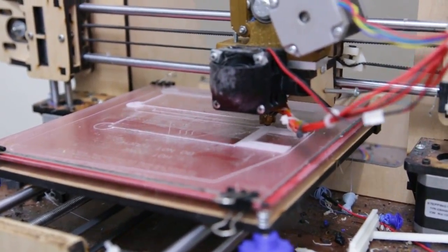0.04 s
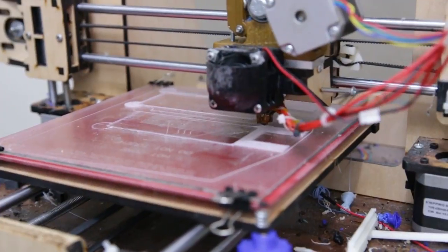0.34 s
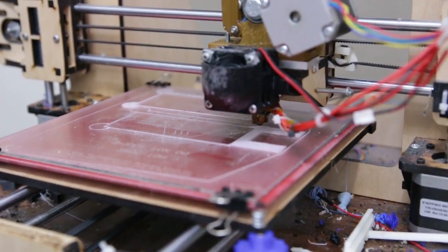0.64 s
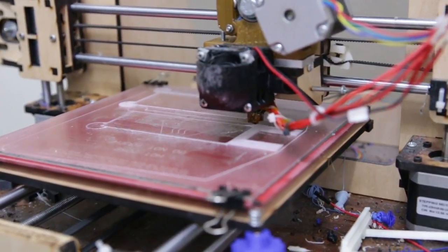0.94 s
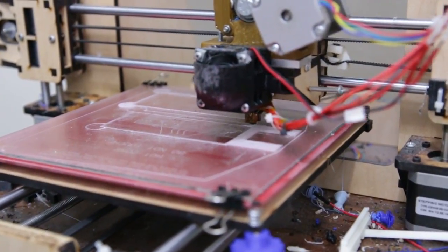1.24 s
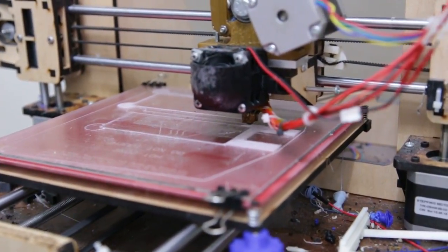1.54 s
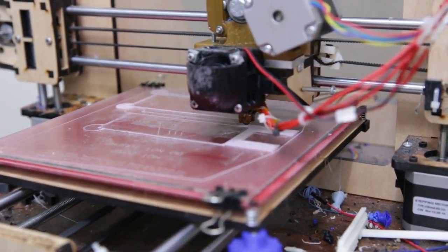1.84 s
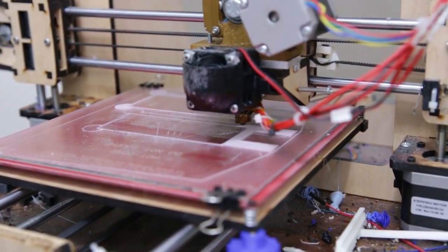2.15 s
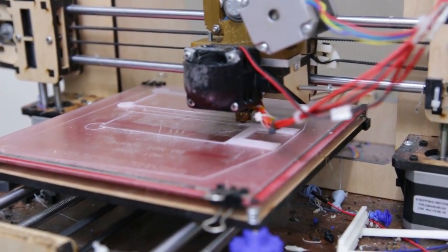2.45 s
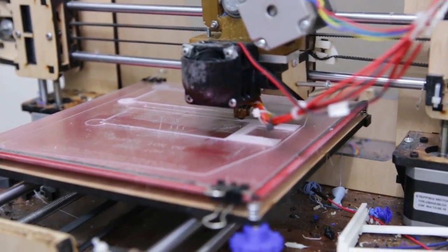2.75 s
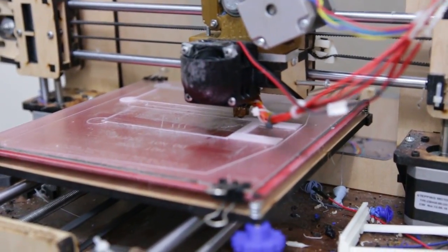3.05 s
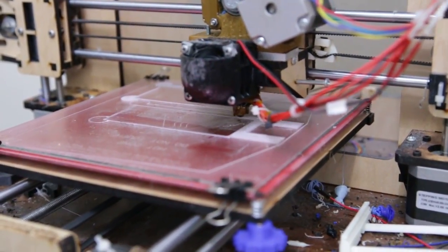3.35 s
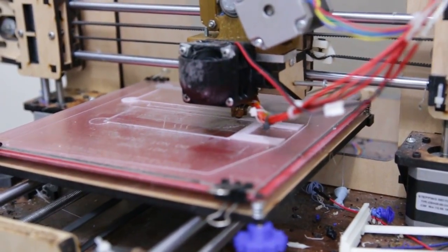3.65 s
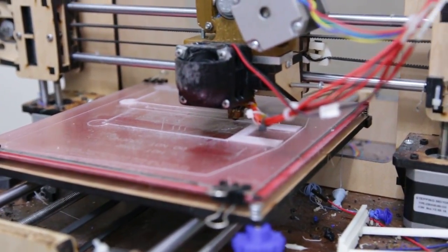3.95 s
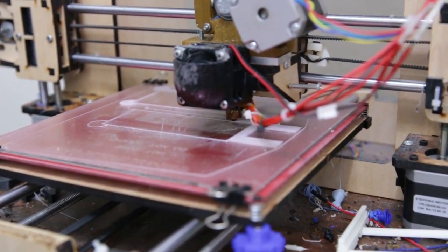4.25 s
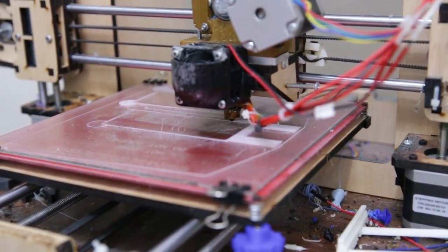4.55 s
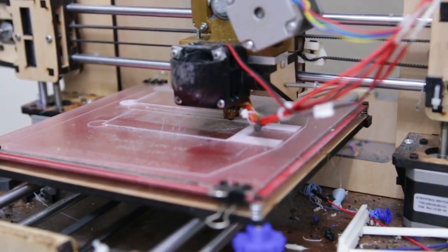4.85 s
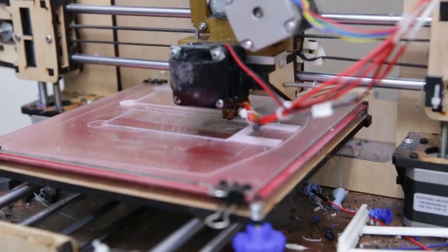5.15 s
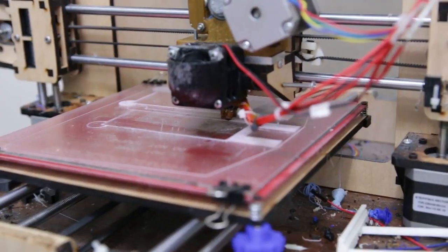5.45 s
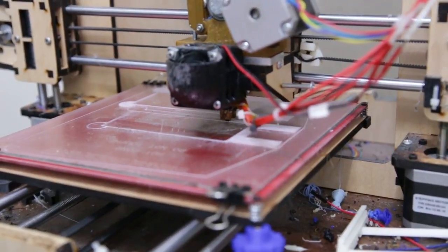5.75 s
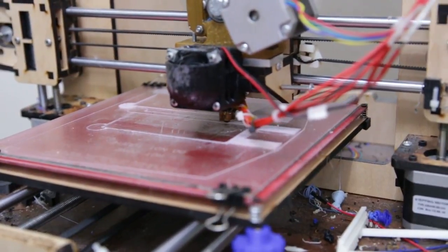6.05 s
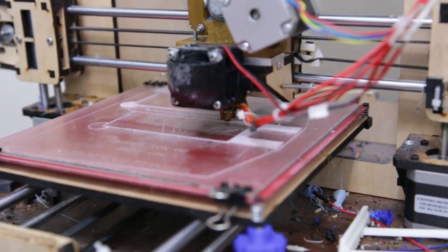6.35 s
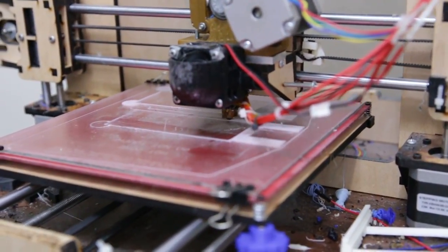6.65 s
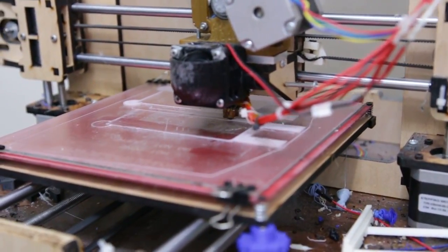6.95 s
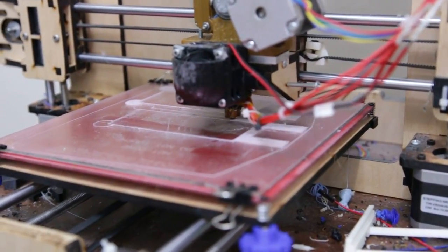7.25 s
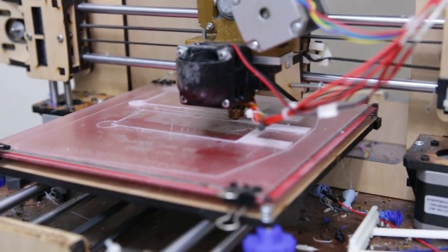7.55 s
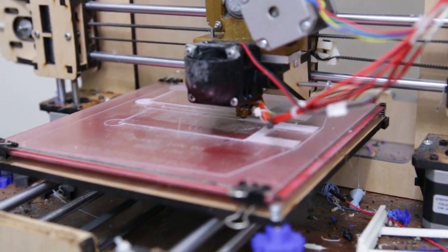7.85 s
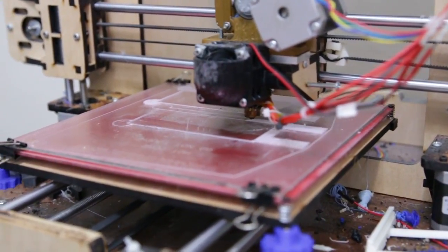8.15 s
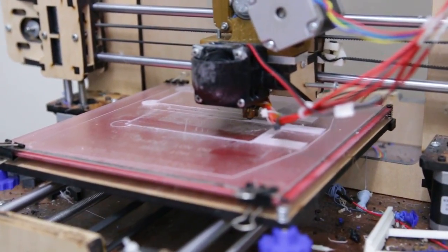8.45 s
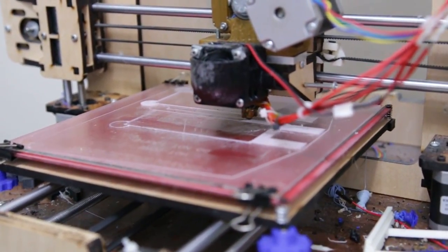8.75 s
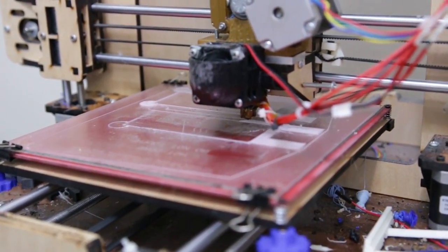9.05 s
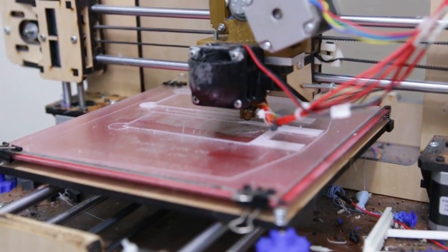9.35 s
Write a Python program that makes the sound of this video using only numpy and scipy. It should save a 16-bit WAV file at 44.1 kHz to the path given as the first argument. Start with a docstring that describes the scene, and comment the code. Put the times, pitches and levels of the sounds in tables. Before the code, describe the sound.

A small 3D printer runs indoors from start to finish, a little over nine seconds. Its head shuttles back and forth at about six strokes a second. On each stroke the motor speeds up and brakes, making a low, mellow, warbling hum that resonates in the wooden frame and repeats as a fast, even flutter. This hum is the loudest sound. Beneath it, bearings rattle lightly in the same rhythm, growing slightly stronger after about 4 seconds, and a thin, very high electrical sizzle comes in short bursts. A fan whooshes softly and steadily underneath. Brief, small clacks occur near 0.2 seconds, at 3.1 and 3.4, around 4.5, at 6, and several times between 7.3 and 8. One tiny, sharp, bright tick snaps at about 4.4 seconds. The room adds only a faint echo, and the pace never changes.

```python
"""A small 3D printer's stepper motor drives the head to and fro, about six strokes a second, filling in a
narrow wall. On each stroke the motor speeds up and brakes. Its slightly uneven pull (torque ripple) sweeps
through the ringing notes of the plywood frame and shakes the bearings into a rattle. The coils sizzle in
short bursts, a fan whooshes softly underneath, and once something ticks sharply."""
import sys
import numpy as np
from scipy import signal
from scipy.fft import rfft, irfft, next_fast_len
from scipy.io import wavfile
from scipy.ndimage import uniform_filter1d

SR = 44100
rng = np.random.default_rng(int(sys.argv[2]) if len(sys.argv) > 2 else 0)


def persist_wave(psi):
    """Save psi, clipped to +-1, as 16-bit WAV."""
    counts = np.round(np.clip(psi, -1, 1) * 32767).astype(np.int16)
    wavfile.write(sys.argv[1], SR, np.atleast_2d(counts).T)


N = 414540
TIME = np.arange(N) / SR

# Each stroke leaves the turn at a slow step rate, speeds up, cruises briefly and brakes into the next turn.
STROKE_S, TURN_HZ, CRUISE_HZ = .1543875, 66.46, 361.1
ACCEL_HZ_PER_S, BRAKE_HZ_PER_S = 4485, 5010
CARRIAGE_HZ = 317.6  # the step rate at which the head's carriage shakes most
# The tone of the rods and bearings. Each row: frequency in Hz, relative level in dB.
ROD_TONE = [(400, -22), (750, -1), (1000, -1), (1280, 0), (1550, 5), (1750, 2.5), (2000, 2.5), (2250, -1.5),
            (2600, -1.5), (3100, -.3), (3600, -2.5), (4200, -7), (4400, -13), (4800, -10), (5500, -16),
            (12000, -36)]


def undb(db):
    """Turn decibels into a gain."""
    return 10 ** (np.asarray(db) / 20)


def level(x, db=0):
    """Scale a sound to an average (rms) level."""
    return x * undb(db) / np.sqrt(np.mean(x ** 2))


def drift(rate_hz):
    """A smooth random wander, roughly 1 in size."""
    hold = int(SR / rate_hz)
    return uniform_filter1d(np.repeat(rng.standard_normal(N // hold + 1), hold), hold)[:N]


def lag(x, seconds):
    """Follow a changing value a little sluggishly."""
    keep = np.exp(-1 / (seconds * SR))
    return signal.lfilter([1 - keep], [1, -keep], x)


def colour(x, points):
    """Shape a sound's tone along a curve of (Hz, dB) points."""
    hz, db = np.transpose(points)
    size = 2 * next_fast_len(N // 2 + SR, real=True)
    freqs = np.maximum(np.fft.rfftfreq(size, 1 / SR), 1)
    gain = undb(np.interp(np.log(freqs), np.log(hz), db))
    cepstrum = irfft(np.log(gain))
    cepstrum[1:size // 2] *= 2  # folded so that the filter rings after a click, never before it
    cepstrum[size // 2 + 1:] = 0
    return irfft(rfft(x, size) * np.exp(rfft(cepstrum)))[:N]


def ring(x, notes):
    """Let a sound set off ringing notes, each given as (Hz, width in Hz, dB)."""
    return sum(undb(db) * signal.lfilter(*signal.iirpeak(hz, hz / width, SR), x)
               for hz, width, db in notes)


def reflect(x, fade_s, echo_db):
    """Add a dense tail of echoes that falls by 60 dB in fade_s."""
    t = TIME[:SR // 2]
    tail = rng.standard_normal(len(t)) * np.exp(-np.log(1000) * t / fade_s)
    return x + undb(echo_db) * signal.fftconvolve(x, tail / np.linalg.norm(tail))[:N]


def knocks(count, spread_db):
    """One click of random size each time a running count passes a whole number."""
    passing = np.diff(np.floor(count), prepend=0) != 0
    return level(passing * undb(spread_db * np.clip(rng.standard_normal(N), -2, 2)))


def blow(start_s, db, decay_s):
    """A sudden jump that dies away."""
    return undb(db) * (TIME >= start_s) * np.exp(-np.abs(TIME - start_s) / decay_s)


def nearness(step_hz, centre_hz, width_hz=25.8):
    """How near the step rate is to a resonance, from 0 to 1."""
    return np.exp(-((step_hz - centre_hz) / width_hz) ** 2)


def fan():
    """The fan stirs the air into a soft, steady noise."""
    # The tone of the fan and room. Each row: frequency in Hz, relative level in dB.
    air_tone = [(25, -28), (40, -9), (55, -4.5), (80, -7.5), (120, -1), (280, -8.5), (500, -3),
                (1000, -8.5), (3000, -39.5), (8000, -24), (15000, -67)]
    return level(colour(rng.standard_normal(N), air_tone), db=-36)


def tick():
    """A tiny, bright snap with a short after-ring."""
    # The sharp tick. Its row: start in seconds, peak level in dB, decay time in seconds.
    snaps = [(4.375, 0, .0002)]
    snap = sum(blow(*row) for row in snaps)
    bright = signal.sosfilt(signal.butter(4, 7500, "high", fs=SR, output="sos"), snap)
    return reflect(bright * snap.max() / np.abs(bright).max(), fade_s=.012, echo_db=-6)


def coils(since_turn, steps):
    """Bursts of tiny steps ring the motor casing near 11 kHz, at each turn and at certain step rates."""
    # Where the coils sizzle. Each row: step rate in Hz, relative level in dB, decay time in seconds.
    sizzle_rates = [(228, -6.5, 0.023), (292, -4, 0.055)]
    # The tone of the casing. Each row: frequency in Hz, relative level in dB.
    case_tone = [(2000, -2), (4400, -1), (6200, 0), (8200, 1.5), (9500, 3.5), (10000, 0.5), (10250, -0.5),
                 (10900, 5.5), (11400, 1), (11850, 0.5), (12500, -4.5), (14200, -15), (15000, -9),
                 (15700, -19)]
    # The casing's ringing notes. Each row: pitch in Hz, width in Hz, level in dB against that tone.
    case_notes = [(6130, 120, -1), (7460, 73, -1), (10880, 45, -2), (11090, 70, 8.5)]
    bursts = [(.0022, -6, .0059)]  # at the turn: delay in seconds, level in dB, decay in seconds
    for hz, db, decay in sizzle_rates:  # once speeding up, once braking
        bursts.append(((hz - TURN_HZ) / ACCEL_HZ_PER_S, db, decay))
        bursts.append((STROKE_S - (hz - TURN_HZ) / BRAKE_HZ_PER_S, db, decay))
    power = undb(-21) ** 2  # a faint sizzle between bursts
    for delay, db, decay in bursts:
        power += undb(db) ** 2 * np.exp(-2 * ((since_turn - delay) % STROKE_S) / decay)
    current = knocks(16 * steps, spread_db=5) + undb(15) * rng.standard_normal(N)  # ticks in hiss
    case = colour(current * np.sqrt(power) * undb(2.5 * drift(400)), case_tone)
    return level(reflect(case + ring(case, case_notes), fade_s=.11, echo_db=-15))


def clacks():
    """On some strokes a bearing takes up its slack in a brief, hard chatter."""
    # The harder clacks. Each row: start in seconds, relative level in dB.
    hits = [(0.159, -14), (3.0898, -10), (3.398, -13), (4.323, -19), (4.484, -14), (6.0284, -8),
            (7.262, -9), (7.413, -14), (7.877, -17), (8.031, -15.5)]
    loudness = sum(blow(start, db, decay_s=.0042) for start, db in hits)
    return loudness * level(colour(rng.standard_normal(N), ROD_TONE), db=-8.5)


def bearings(steps, step_hz, braking):
    """Loose bearings knock on the rods four times a step and rub, hardest when the carriage resonates."""
    # The rods' ringing notes. Each row: pitch in Hz, width in Hz, level in dB against the rods' tone.
    rod_notes = [(1065, 3.8, 6), (1120, 5.8, -20), (1530, 18, -6), (2552, 85, 2.5), (3135, 63, -2),
                 (3546, 55, 2), (4136, 47, 2)]
    rest_db, run_db, brake_db, rub_db = -11.5, -25, -12, 8
    running = step_hz / CRUISE_HZ * (undb(run_db) + undb(brake_db) * braking)
    flare = nearness(step_hz, CARRIAGE_HZ) * undb(-8 * braking)  # weaker while braking
    shaking = undb(rest_db) + lag(running + flare, seconds=.0094)
    contact = knocks(4 * steps, spread_db=8) + undb(rub_db) * rng.standard_normal(N)
    rods = colour(contact * shaking * undb(1.14 * drift(30)), ROD_TONE)
    return level(reflect(rods + ring(rods, rod_notes), fade_s=.05, echo_db=-13))


def head_motion(first_turn_s=.1007, back_speedup=1.014):
    """The head shuttles out and back with slightly loose timing, cruising a bit faster on the way back."""
    trip_time = (TIME - first_turn_s + .0003 * drift(3)) % (2 * STROKE_S)
    t = TIME[TIME < 2 * STROKE_S]  # plan one round trip, then repeat it
    rising = TURN_HZ + ACCEL_HZ_PER_S * (t % STROKE_S)
    falling = TURN_HZ + BRAKE_HZ_PER_S * (STROKE_S - t % STROKE_S)
    cruise = CRUISE_HZ * np.where(t < STROKE_S, 1, back_speedup)
    planned_hz = np.minimum(cruise, np.minimum(rising, falling))
    step_hz = np.interp(trip_time, t, planned_hz)
    steps = np.interp(trip_time, t, np.cumsum(planned_hz) / SR)
    steps = steps + .02 * drift(40) + .14 * drift(2)  # the steps run slightly early or late
    braking = np.interp(trip_time, t, 1. * (falling <= planned_hz))
    since_turn, outward = trip_time % STROKE_S, trip_time < STROKE_S
    return since_turn, step_hz, steps, braking, outward


def ripple(steps, overtones, waver_db=1.2):
    """A stepper's uneven pull: tones at multiples of its step rate, each wavering in level."""
    return sum(undb(db + waver_db * drift(14)) * np.sin(2 * np.pi * multiple * steps)
               for multiple, db in overtones)


def effort_db(step_hz, braking, outward):
    """The ripple grows with speed, at the carriage's resonance and under braking."""
    thump_db = 5.5 * nearness(step_hz, 339.4)  # the frame thumps as the outward stroke starts to brake
    braking_db = braking * np.where(outward, 3.3 + thump_db, 4)
    resonance_db = (1 - braking) * 6.5 * nearness(step_hz, CARRIAGE_HZ)
    return 15.5 * step_hz / CRUISE_HZ + lag(braking_db + resonance_db, seconds=.00053)


def motors(steps, ripple_db, feed_ratio=.7025):
    """The head motor and the slower plastic feeder, tied to its speed, sweep through the frame's notes."""
    # The head motor's ripple. Each row: multiple of its step rate, relative level in dB.
    head_ripple = [(1.0, -1.5), (2.0, 2), (3.0, -3), (4.0, -3.5), (5.0, 1.5), (6.0, -13), (8.0, -2)]
    # The feeder motor's ripple, with the same columns.
    feed_ripple = [(1.0, -7), (2.0, -8), (3.0, -30.5), (4.0, -15.5)]
    # Notes of the frame and bed. Each row: pitch in Hz, width in Hz, relative level in dB, sign (1 or -1).
    frame_notes = [(109.3, 8.6, -17, 1), (125, 11.7, -25, 1), (169, 61, -32, -1), (216.1, 6.2, -18, -1),
                   (252.2, 9.7, -16, 1), (277.8, 21.3, -16, -1), (363.8, 9.2, -25, -1),
                   (373.7, 24.8, -19, -1), (409.8, 6.6, -18, 1), (517.5, 11, -35.5, -1),
                   (583, 25, -33.5, 1), (612.7, 10.4, -23.5, -1), (715, 7.5, -32.5, 1), (804, 48, -27, 1),
                   (843, 11.8, -27, 1), (949, 16, -29.5, -1), (1176, 24, -29, 1)]
    pull = (ripple(steps, head_ripple) + ripple(feed_ratio * steps, feed_ripple)) * undb(ripple_db)
    # the hum's high overtones are rolled off, keeping it low and mellow
    soften = signal.butter(4, 1390, fs=SR, output="sos")
    pull = signal.sosfiltfilt(soften, pull)
    return sum(sign * ring(pull, [(hz, width, db)]) for hz, width, db, sign in frame_notes)


def scene():
    """One motion drives hum, rattle and sizzle; the room answers faintly."""
    # Slow changes along the wall. Each row: time in seconds, rattle gain in dB, sizzle gain in dB.
    travel = [(0, -32, -35), (1.5, -33, -35), (3, -32, -34.5), (4.5, -30.5, -34), (6.2, -30.5, -33.5),
              (8, -31, -34.5), (9.4, -30.5, -35)]
    times, *gains = np.transpose(travel)
    rattle_db, sizzle_db = (np.interp(TIME, times, gain) for gain in gains)
    since_turn, step_hz, steps, braking, outward = head_motion()
    hum = level(motors(steps, effort_db(step_hz, braking, outward)), db=-22)
    rattle = level(bearings(steps, step_hz, braking), db=.63) * undb(rattle_db) + clacks()
    sizzle = coils(since_turn, steps) * undb(sizzle_db)
    clatter = reflect(rattle + sizzle, fade_s=.37, echo_db=-14)
    return (hum + clatter + tick() + fan())[None]


def record(dry):
    """The microphone thins the deep bass and the recorder cuts the highest treble."""
    thin = signal.sosfilt(signal.butter(3, 68, "high", fs=SR, output="sos"), dry)
    return signal.sosfilt(signal.ellip(10, .2, 80, 15850, fs=SR, output="sos"), thin)


dry = scene()
out = record(dry)
persist_wave(out)
```